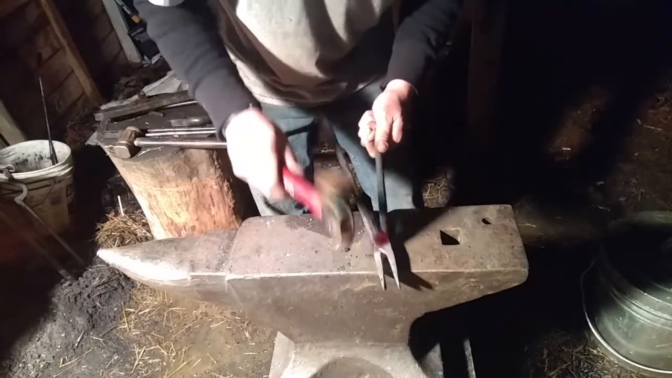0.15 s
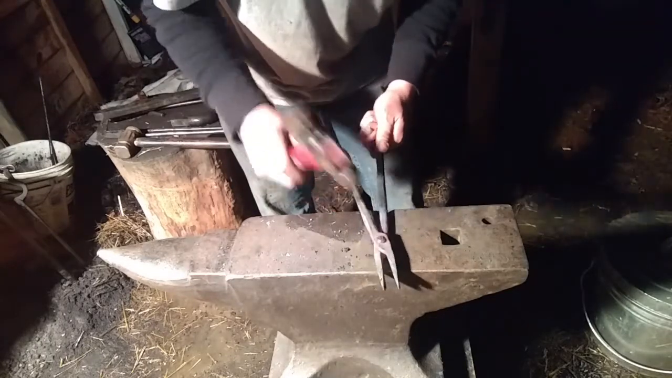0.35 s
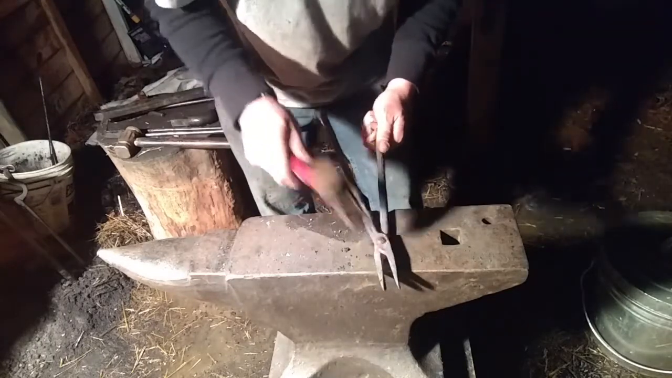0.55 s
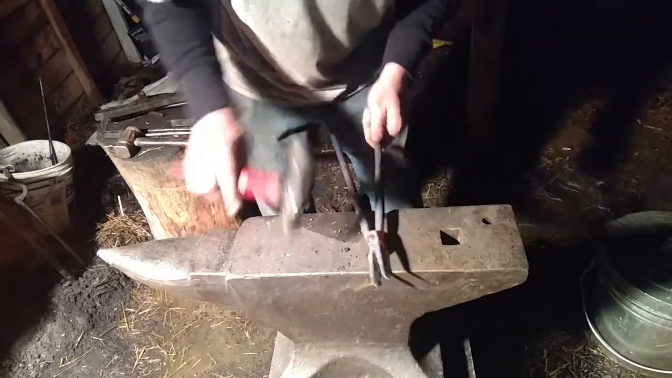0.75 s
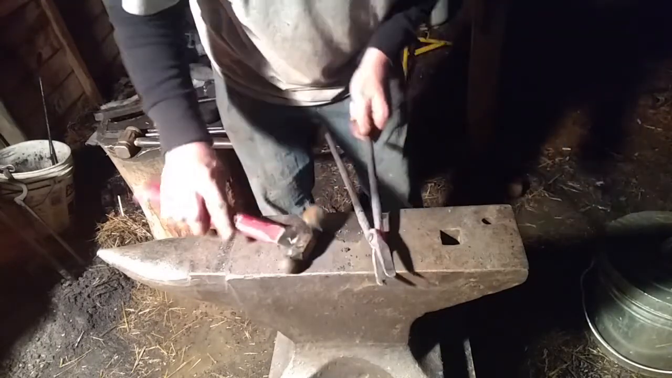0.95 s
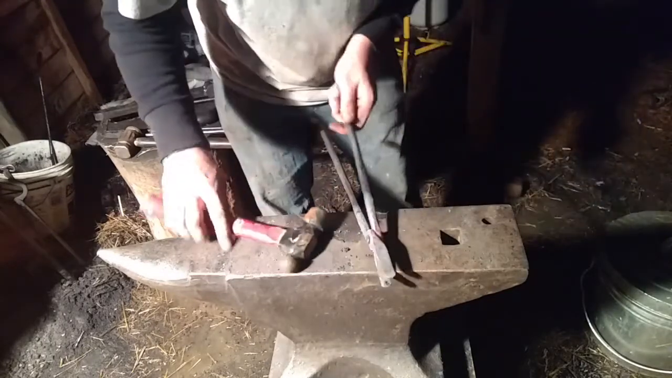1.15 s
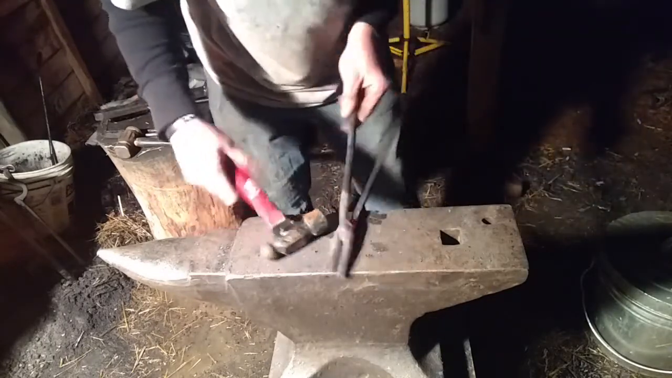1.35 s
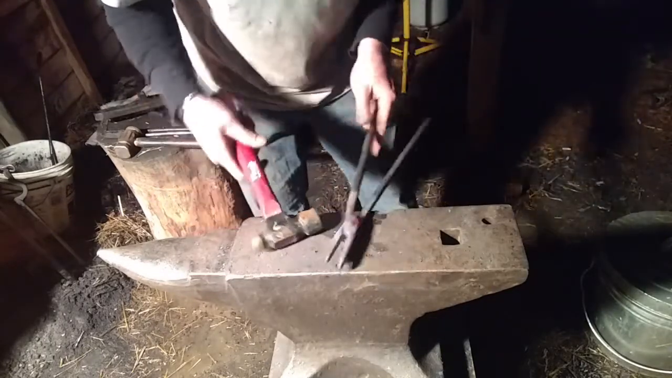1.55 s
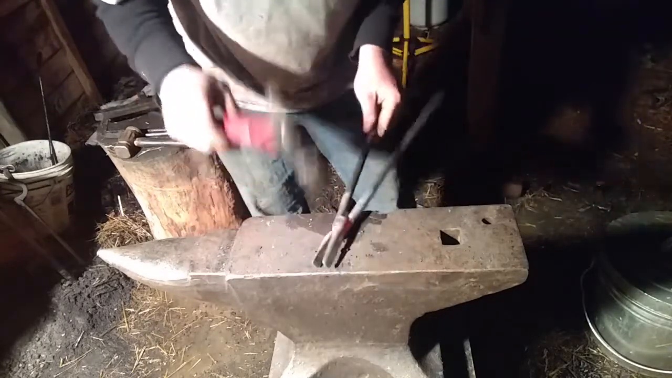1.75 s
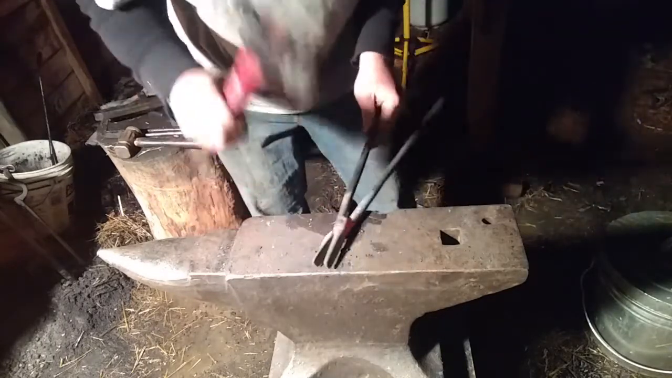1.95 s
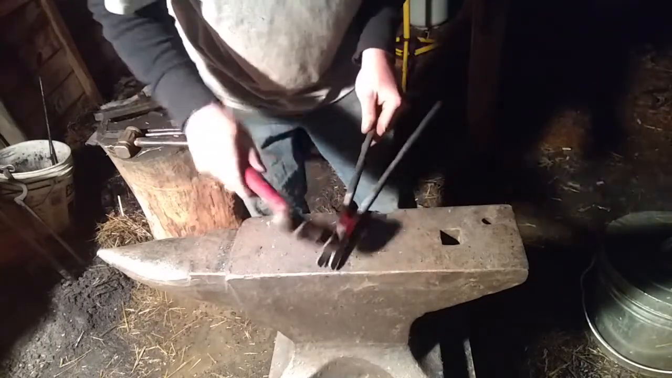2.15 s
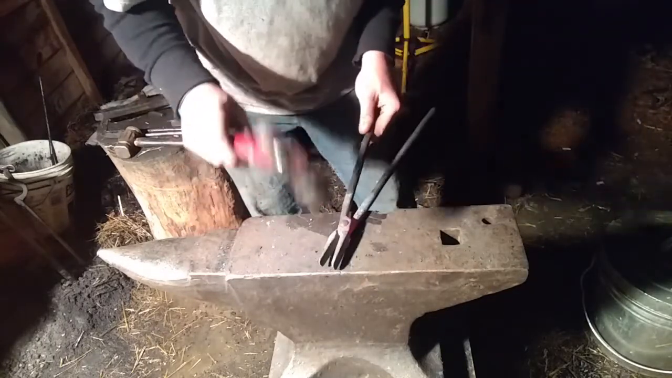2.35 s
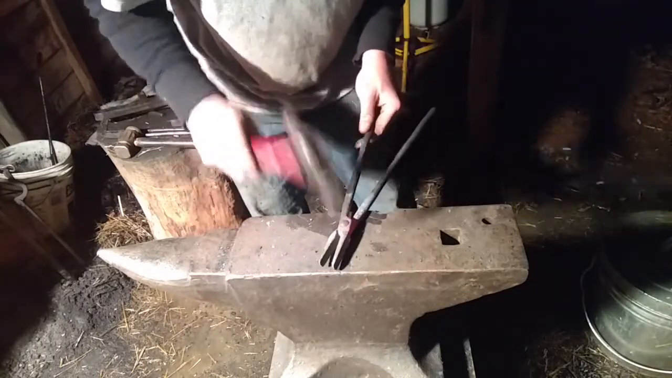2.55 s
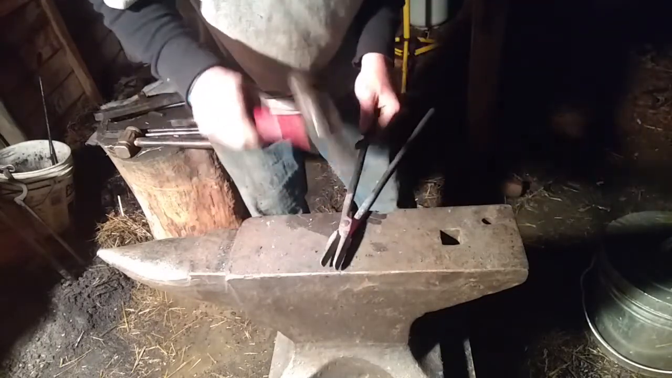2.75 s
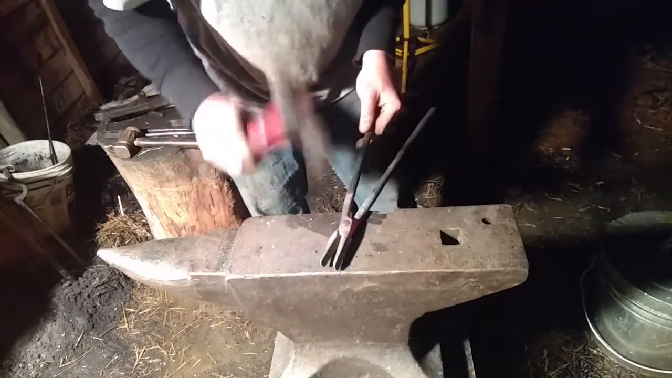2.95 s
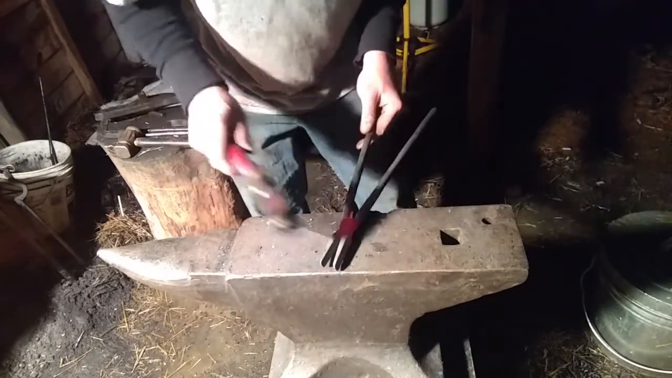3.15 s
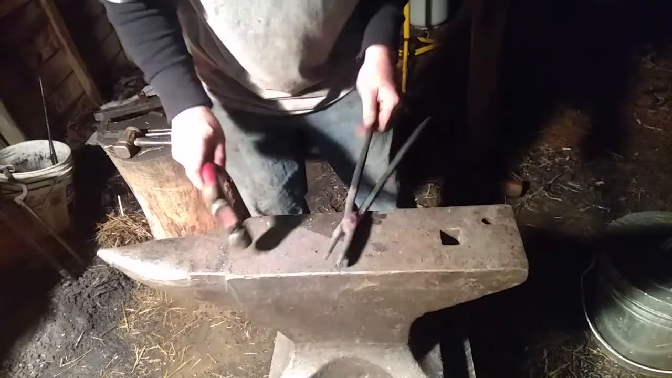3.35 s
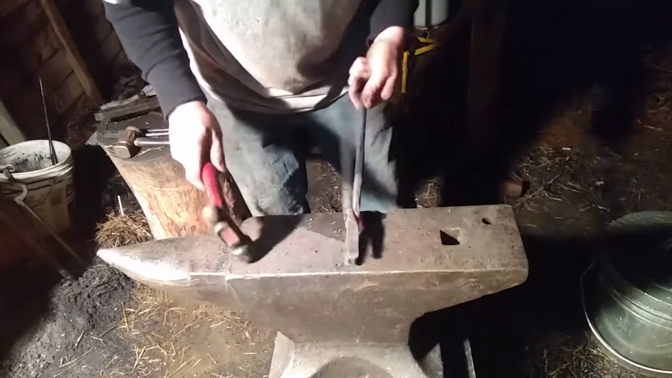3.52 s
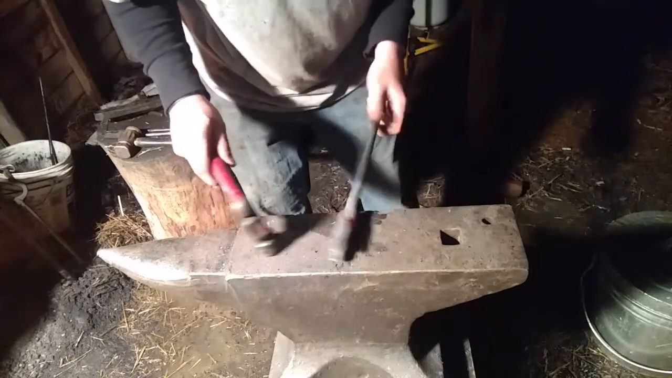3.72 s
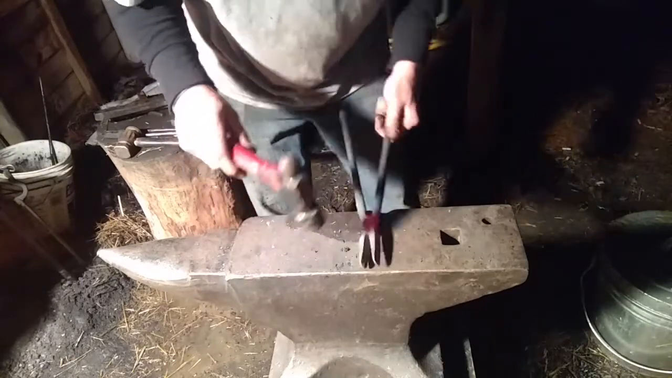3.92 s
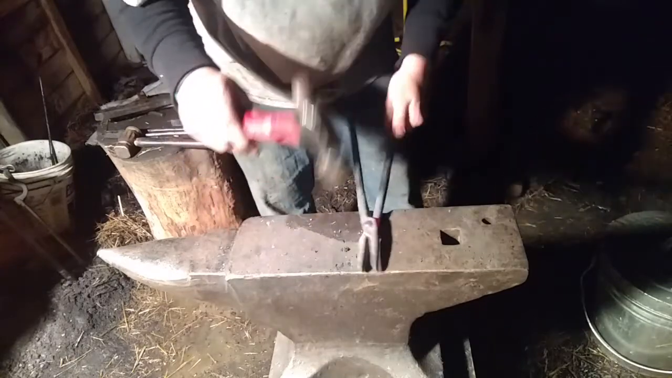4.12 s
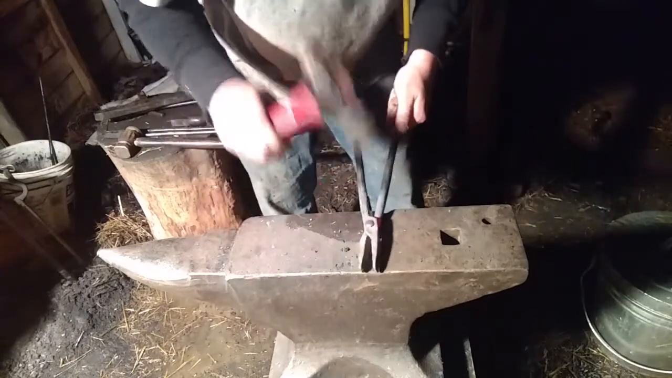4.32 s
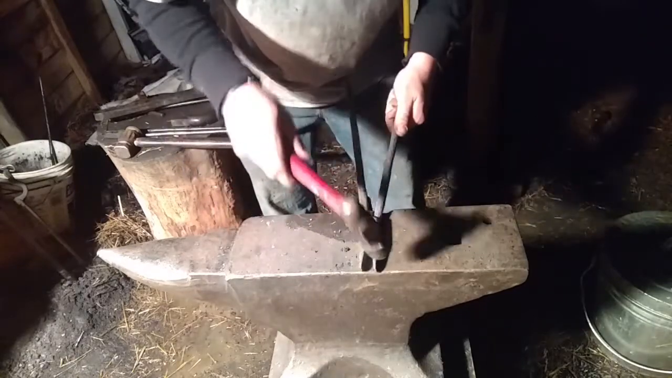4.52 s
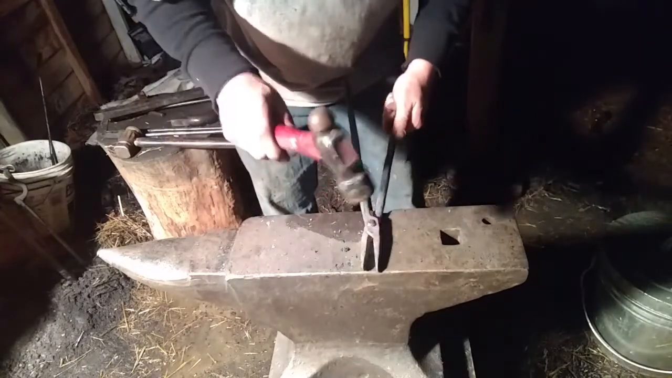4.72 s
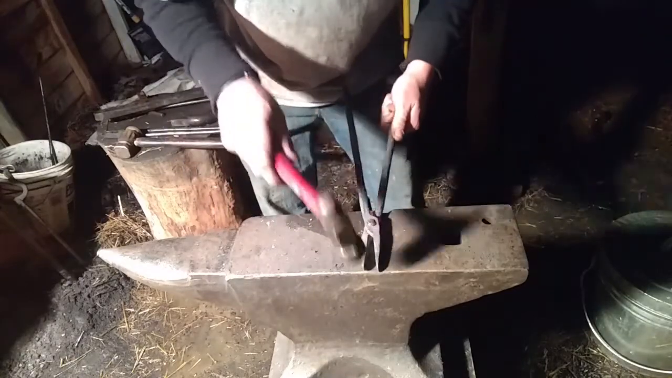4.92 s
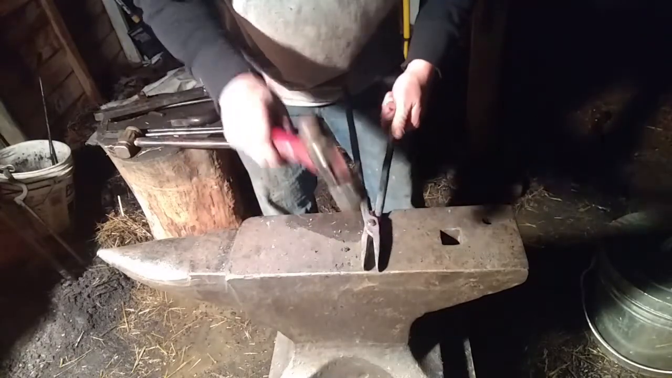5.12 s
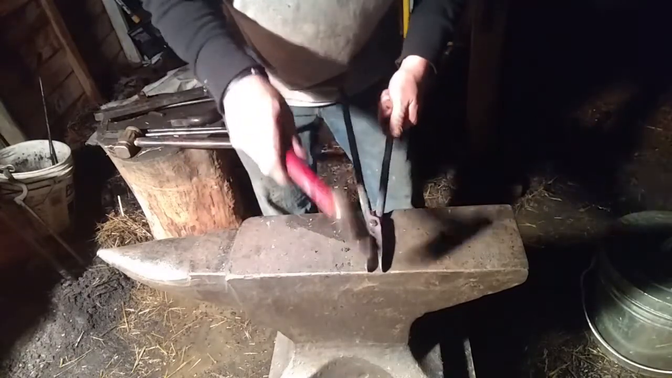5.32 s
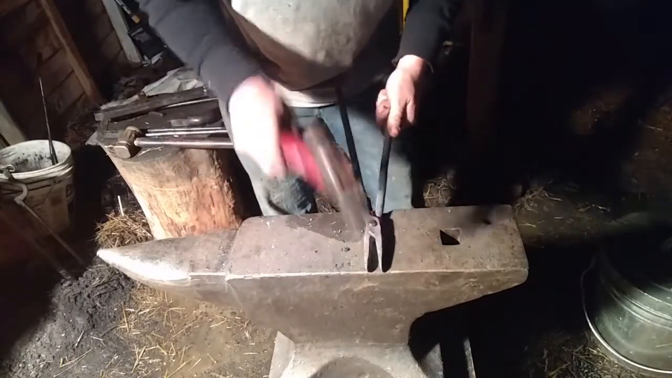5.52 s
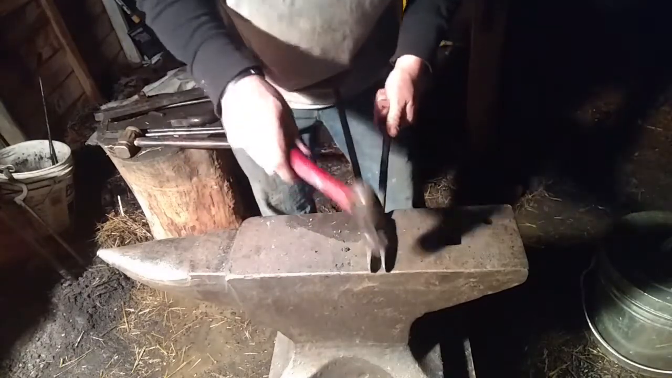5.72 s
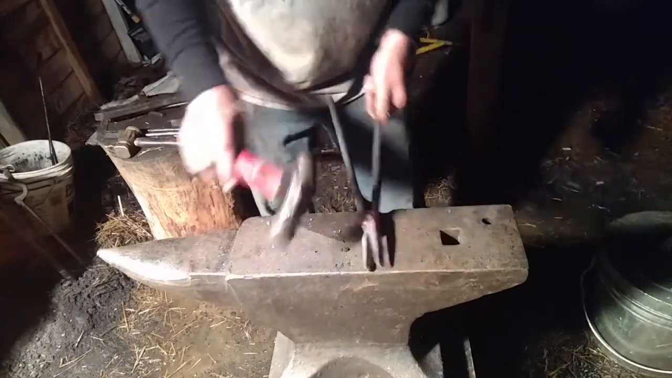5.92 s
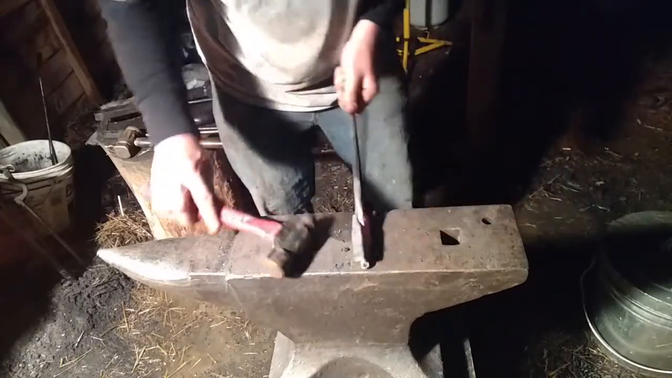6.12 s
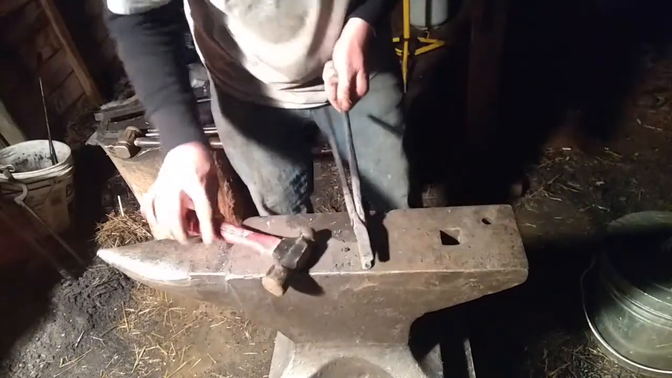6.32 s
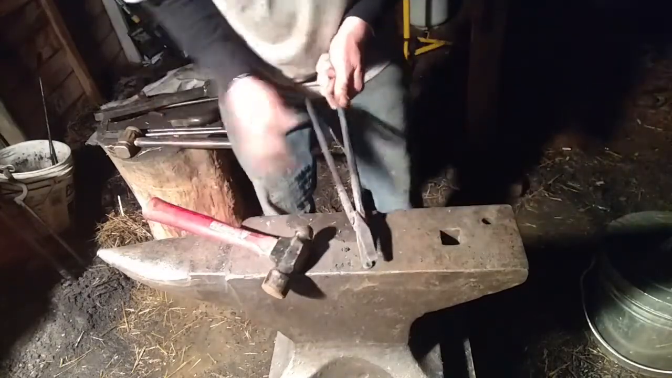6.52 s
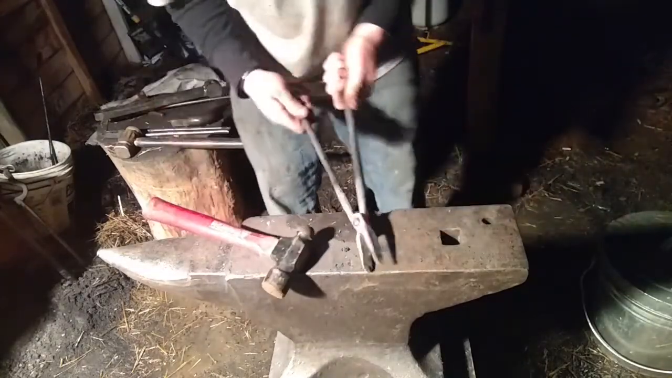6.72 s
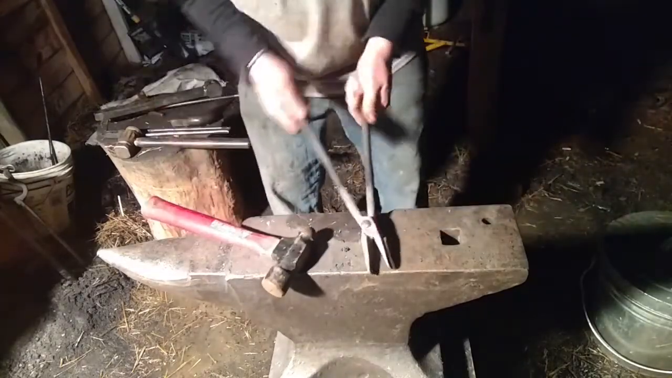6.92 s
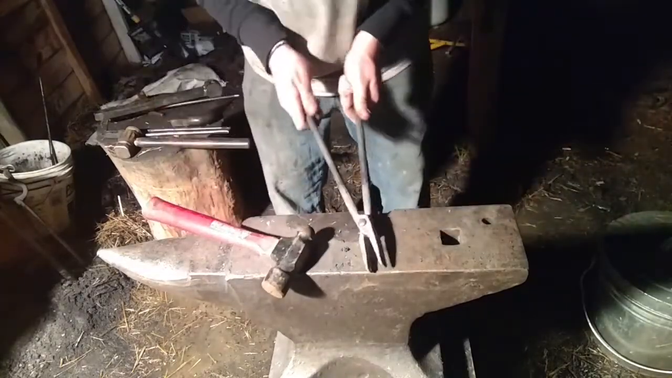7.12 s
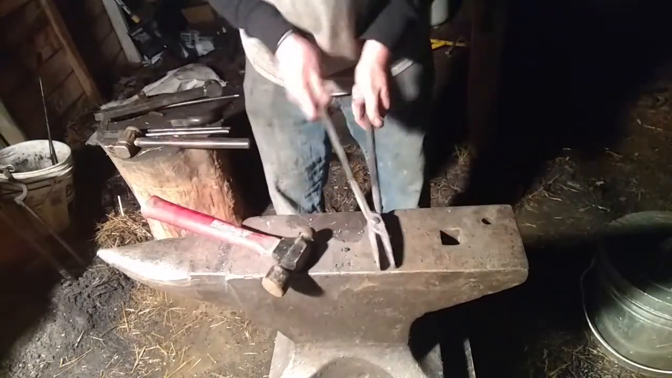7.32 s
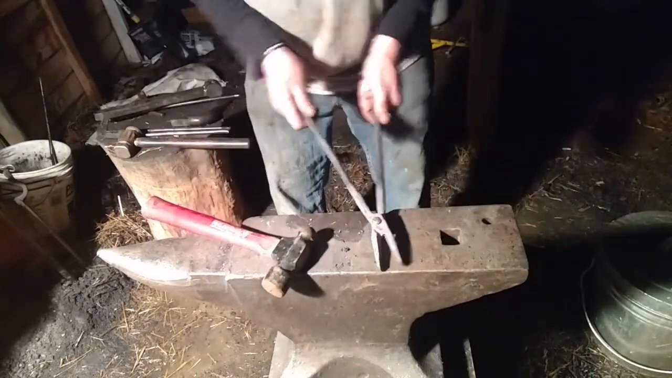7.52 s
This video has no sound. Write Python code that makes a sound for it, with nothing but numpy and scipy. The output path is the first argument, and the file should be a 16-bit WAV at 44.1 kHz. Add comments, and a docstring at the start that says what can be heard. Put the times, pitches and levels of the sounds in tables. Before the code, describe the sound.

In a small forge, dull metallic hammer strikes alternate with bright rattling bounces on bare anvil, tongs clinking, over rushing blower air.

```python
"""Hammer blows on a hot rivet, held in tongs on an anvil: dull cracks of shaped echoes plus ringing modes.
Between them the hammer drops on the bare face and bounces ever faster, ringing; it also taps the face.
The tongs clink as they are turned. Behind, filtered noise makes a forge blower's steady rush, whine and hiss.
Two close microphone ports listen in a small wooden forge. An automatic gain ducks at hard blows and creeps
back, so the blower seems to sag and swell."""
import sys
import numpy as np
from scipy import signal
from scipy.fft import rfft, irfft, next_fast_len
from scipy.io import wavfile
from scipy.ndimage import uniform_filter1d, minimum_filter1d, map_coordinates

SR = 44100
rng = np.random.default_rng(int(sys.argv[2]) if len(sys.argv) > 2 else 0)


def unload_audio(sound):
    """Save the sound as a 16-bit wav file, at the path given as the first command line argument."""
    columns = np.transpose(np.atleast_2d(sound))
    # keep every value between -1 and 1, then stretch to whole-number steps
    steps = np.round(np.clip(columns, -1, 1) * 32767)
    wavfile.write(sys.argv[1], SR, steps.astype(np.int16))


N = 333828
T = np.arange(int(.8 * SR)) / SR  # time axis of one contact, s


def amp(db):
    """Decibels to amplitude gain."""
    return 10 ** (np.asarray(db) / 20)


def unit(x):
    """Scale to rms 1."""
    return x / np.sqrt(np.mean(x ** 2) + 1e-20)


def along(points, hz):
    """Interpolate (f/Hz, value) points on a log frequency axis."""
    f, v = np.transpose(points)
    return np.interp(np.log(hz + 1), np.log(f + 1), v)


def filtered(x, response):
    """Multiply the spectrum of x by a function of frequency."""
    n = x.shape[-1]
    m = next_fast_len(n + 8192)
    spectrum = rfft(x, m) * response(np.fft.rfftfreq(m, 1 / SR))
    return irfft(spectrum, m)[..., :n]


def causal(db):
    """Minimum-phase response with this gain, by folding the cepstrum."""
    cepstrum = irfft(np.log(amp(db)))
    half = len(cepstrum) // 2
    cepstrum[1:half] *= 2
    cepstrum[half + 1:] = 0
    return np.exp(rfft(cepstrum))


def noise_pair(correlation, size):
    """Left and right white noise with a given correlation at each frequency, from mid and side."""
    def mid_side_gains(hz):
        angle = np.arccos(np.clip(along(correlation, hz), -1, 1)) / 2
        return np.array([np.cos(angle), np.sin(angle)])

    mid, side = filtered(rng.standard_normal((2, size)), mid_side_gains)
    return np.array([mid + side, mid - side])


def add(track, t_s, sound):
    """Mix a sound in at time t_s."""
    part = track[:, max(round(t_s * SR), 0):][:, :len(T)]
    part += sound[..., :part.shape[1]]


def treble_db(sound):
    """Running level above 2.5 kHz, averaged over 8 ms."""
    treble = filtered(sound, lambda hz: hz ** 4 / np.sqrt(hz ** 8 + 2500. ** 8))
    power = uniform_filter1d(np.mean(treble ** 2, axis=0), size=350)
    return 10 * np.log10(np.abs(power) + 1e-12)


def at_level(sound, db):
    """Scale a contact so that its running treble level peaks at db."""
    return sound * amp(db - treble_db(sound).max())


# blower air, left-right correlation: f/Hz, correlation
AIR_CORRELATION = [(60, -0.88), (150, -0.15), (380, 0.26), (950, 0.7), (2380, -0.51), (5980, 0.16),
                   (15000, -0.021)]
# blower air, left over right: f/Hz, level/dB
AIR_BALANCE = [(60, 1), (110, -7.5), (200, -7.5), (380, -9), (700, -7.5), (1290, -3), (2380, -5),
               (4400, -2), (8120, 0), (15000, 0.5)]
# spectrum of the rush: f/Hz, level/dB
RUSH_SPECTRUM = [(15, -82), (25, -20), (128, -17), (161, -8), (331, -9), (365, -1), (403, -18), (479, -4.5),
                 (594, -8), (764, -6.5), (826, -5), (1060, -11), (1940, -13), (2270, -12.5), (2600, -19),
                 (3380, -72), (5720, -120)]
# spectrum of the hiss: f/Hz, level/dB
HISS_SPECTRUM = [(1500, -27), (2400, -28), (2800, 1.5), (3500, -0.5), (4600, -0.5), (5200, -5), (6300, 2.5),
                 (7100, -4.5), (7900, -23), (9000, -3), (10500, -20.5), (12000, -12.5), (15000, -28),
                 (16500, -49)]
# blower resonances: f/Hz, width at half amplitude/Hz, level against rush/dB
WHINE_RESONANCES = [(381.4, 41, -13), (771, 19.4, -9), (1089.6, 31, -11.5), (2197, 19, -5)]
RUSH_DB, HISS_DB = -44.5, -48.5


def blower():
    """Steady broadband air noise, narrow resonances excited by noise, and a hiss."""
    def air(response):
        return unit(filtered(noise_pair(AIR_CORRELATION, size=N), response))

    def resonance(centre_hz, width_hz):
        return air(lambda hz: 1 / (1 + (2 * (hz - centre_hz) / width_hz) ** 2))

    rush = air(lambda hz: amp(along(RUSH_SPECTRUM, hz)))
    whine = sum(amp(db) * resonance(centre_hz, width_hz) for centre_hz, width_hz, db in WHINE_RESONANCES)
    hiss = air(lambda hz: amp(along(HISS_SPECTRUM, hz)))
    sound = amp(RUSH_DB) * (rush + whine) + amp(HISS_DB) * hiss
    return filtered(sound, lambda hz: amp(np.outer([.5, -.5], along(AIR_BALANCE, hz))))


# echoes, left-right correlation: f/Hz, correlation
ROOM_CORRELATION = [(100, 0), (400, 0.89), (900, 0.95), (3000, 0.9), (12000, 0.89)]
# tail of the shed: f/Hz, t60/s, level/dB
SHED_TAIL = [(150, 0.49, 0), (700, 0.33, -19.5), (2040, 0.2, 9), (5900, 0.13, 18.5), (13700, 0.15, 6)]


def echoes(near_db, near_t60_s, hold_s, far_db):
    """Dense reflections from floor, smith and benches as decaying noise, plus the shed's short tail."""
    near_envelope = amp(near_db - 60 * np.maximum(T - hold_s, 0) / near_t60_s)
    near = near_envelope * noise_pair(ROOM_CORRELATION, size=len(T))
    hz, t, z = signal.stft(noise_pair(ROOM_CORRELATION, size=len(T)), SR, nperseg=256)
    bands_hz, *columns = np.transpose(SHED_TAIL)
    t60_s, wall_db = [along(np.c_[bands_hz, column], hz)[:, None] for column in columns]
    far = signal.istft(z * amp(far_db + wall_db - 60 * t / t60_s), SR)[1][:, :len(T)]
    arrival = 1 - np.exp(-(T / .002) ** 2)
    return (near + far) * arrival


# first crack against its echoes: f/Hz, level/dB
PUSH_SPECTRUM = [(100, -5.5), (600, -4), (1200, 5.5), (2100, 8.5), (3000, -4), (6000, 4.5), (14000, -9.5)]


def contact(spectrum, tone, crack_db, room):
    """One sharp push and its echoes, coloured by the metal and by how hard it meets."""
    impulse = amp(crack_db) * (T == 0)
    push = filtered(impulse, lambda hz: causal(along(PUSH_SPECTRUM, hz)))
    return filtered(push + room, lambda hz: causal(along(spectrum, hz) + along(tone, hz)))


def colour(thud_db, knock_db, sizzle_db):
    """Tone of one hammer contact, as f/Hz, gain/dB."""
    return [(750, thud_db), (1100, knock_db), (2200, knock_db), (3400, 0.22 * knock_db),
            (6500, -1.95), (9500, sizzle_db)]


def ring(modes):
    """Decaying modes, their strengths drawn anew per impact; phases differ slightly between the ports."""
    hz, db, t60_s = np.transpose(modes)
    strength = amp(db + 1.2 * rng.standard_normal(len(hz)))
    phase = 2 * np.pi * rng.random(len(hz)) + .25 * rng.standard_normal((2, len(hz)))
    swing = np.exp(np.outer(2j * np.pi * hz - np.log(1000) / t60_s, T))
    onset = 1 - np.exp(-T / 0.00035)
    return np.einsum("ck,kt->ct", strength * np.exp(1j * phase), swing).imag * onset


# tongs shifting on the face: t/s, gain/dB, clank gain from 3.4 kHz up/dB
CLINKS = [(0.6848, -25.5, 2.5), (1.3688, -33.5, 8.5), (1.5264, -27, -2.5), (1.7246, -20, -9.5),
          (1.8711, -20, -1.5), (1.937, -20.5, -14), (2.06, -29.5, -9), (3.8808, -26, 9.5),
          (4.0733, -26.5, -16), (4.1594, -29.5, 7)]
# spectrum of tongs on the face: f/Hz, level/dB
CLINK_SPECTRUM = [(100, -24), (700, -5), (1100, -9.5), (1700, 6.5), (2400, -8), (4200, 1.5), (5000, -6),
                  (6200, -6.5), (9000, -19), (15000, -29)]
# modes of the tongs: f/Hz, level/dB, t60/s
TONGS_MODES = [(735, 1, .12), (1523, 4.5, .135), (2690, -5, .06), (4380, -12, .05), (5450, -12, .05),
               (7490, -14, .07), (9378, -15, .08)]


def turning():
    """The tongs tap and scuff the face as they are rolled over: a contact plus their own modes."""
    out = np.zeros((2, N))
    for t_s, db, clank_db in CLINKS:
        room = echoes(near_db=-27.0, near_t60_s=0.14, hold_s=0.0077, far_db=-54)
        tap = contact(CLINK_SPECTRUM, [(2200, 0.013), (3400, clank_db)], -7.5, room)
        add(out, t_s, amp(db) * (amp(19.0) * tap + amp(-22.0) * ring(TONGS_MODES)))
    return out


# spectrum of hammer on bare face: f/Hz, level/dB
FACE_SPECTRUM = [(30, -28), (120, -22), (300, -9), (500, -7.5), (750, 4.5), (950, -3), (1600, 2), (2200, 4),
                 (2900, 0.5), (4200, -1), (7000, -9), (9000, 17.5), (11500, 1), (15500, 4)]
# modes of the anvil face: f/Hz, level/dB, t60/s
FACE_MODES = [(1437, -10, .25), (1526, -3, .25), (1988, -6, .14), (2395, -8, .17), (2802, -6, .15),
              (3235, -12, .15), (3325, -4, .18), (3617, -6, .19), (3914, -5, .14), (4270, -9, .13),
              (4981, -12, .14), (5923, -10, .16), (6298, -14, .14)]
# bending of the whole anvil, horn against heel: f/Hz, level/dB, t60/s
BELL_MODES = [(1032, -11, .4), (1888, 0, .6), (2476, -19, .33)]
# modes of the hammer head: f/Hz, level/dB, t60/s
HAMMER_MODES = [(2295, 7, .05), (2360, 5, .065), (8802, -3, .09), (8886, 1, .115), (13250, -25, .08)]
FACE_DB, FACE_BELL_DB, FACE_THUD_DB = -17.5, -22.5, -1  # relative, before at_level
# a softer contact lasts longer and presses less on the face: change per force lost, dB/dB
SIZZLE_FALL, HAMMER_FALL, CRACK_FALL, FACE_GAIN = 0.96, 0.47, 0.16, 0.24


def face_hit(lost_db, knock_db, sizzle_db, hammer_db, crack_db):
    """Steel on bare steel: a bright click, hammer head and anvil ringing; duller as force is lost."""
    room = echoes(near_db=-15.5, near_t60_s=0.08, hold_s=0.0038, far_db=-32.5)
    tone = colour(knock_db + FACE_THUD_DB, knock_db, sizzle_db - SIZZLE_FALL * lost_db)
    crack = contact(FACE_SPECTRUM, tone, crack_db - CRACK_FALL * lost_db, room)
    bell = amp(FACE_BELL_DB + knock_db) * ring(BELL_MODES)
    # a light tap lets the face ring; a heavy one damps it
    face = amp(FACE_DB + FACE_GAIN * lost_db) * ring(FACE_MODES)
    hammer = amp(hammer_db - HAMMER_FALL * lost_db) * ring(HAMMER_MODES)
    return amp(16) * crack + bell + face + hammer


# hammer head on the face, not flying free: t/s, treble level/dB,
# then at full force and relative: knock/dB, sizzle/dB, hammer ring/dB
TAPS = [(0.842, -6, -5, -19, -8), (0.859, -16, -8, -6, -16), (3.3212, -6, 4.5, -21.5, -51),
        (3.4246, -13.5, 2.5, -21, -45), (3.5189, -21.5, 12, -22, -40), (3.6127, -29, 10.5, -5, -40),
        (3.6826, -43.5, 18, -14, -30)]
FULL_TAP_DB, TAP_CRACK_DB = 1.5, 5  # at full force: treble level, first crack


def tapping():
    """Single contacts of the hammer head with the face, as it topples or is eased down by hand."""
    out = np.zeros((2, N))
    for t_s, db, knock_db, sizzle_db, hammer_db in TAPS:
        hit = face_hit(FULL_TAP_DB - db, knock_db, sizzle_db, hammer_db, TAP_CRACK_DB)
        add(out, t_s, at_level(hit, db))
    return out


# hammer dropped on the bare face: t/s, treble level/dB, loss per bounce/dB,
# then relative, at first contact: knock/dB, sizzle/dB, hammer ring/dB, first crack/dB
DROPS = [(0.8228, -2, 7, -4, -23, -12, 9), (6.0162, -1, 6.5, -2.5, -23.5, -8, 2.5)]
FIRST_FLIGHTS_S, RESTITUTION = (.1365, .1156), .648


def bouncing(count=5):
    """The dropped hammer bounces: restitution shortens every flight and each contact is weaker."""
    out = np.zeros((2, N))
    for (t_s, db, loss_db, *tone), flight_s in zip(DROPS, FIRST_FLIGHTS_S):
        for k in range(count):
            lost_db = k * loss_db
            add(out, t_s, at_level(face_hit(lost_db, *tone), db - lost_db))
            t_s += flight_s * RESTITUTION ** k
    return out


def grip(sound, depth_db, spacing_hz):
    """The jaws lie differently under every blow: a random ripple for their many damped upper resonances."""
    knots = rng.standard_normal(400)

    def ripple(hz):
        random_curve = map_coordinates(knots, [hz / spacing_hz], mode="mirror")
        return random_curve * np.clip(hz / 4000, 0, 1) ** 2

    return filtered(sound, lambda hz: causal(depth_db * ripple(hz)))


# blows on the rivet: t/s, treble level/dB, then relative: knock/dB, thud of the jaws/dB, sizzle/dB,
# anvil bell/dB, first crack/dB; favoured jaw note f/Hz
BLOWS = [(0.0759, -15, 6.5, 1.5, -21, -15, -5.5, 4120), (0.0929, -9.5, 6.5, 0.5, -18, -20, 3, 3544),
         (0.4435, -9.5, 0.5, 0.5, -10.5, -21, 6.5, 5970), (2.103, -7, -7.5, -0.5, -8, -38, -7.5, 6030),
         (2.6095, -9, -2.5, 0, -0.5, -36, -7.5, 8850), (3.04, -14, 8, 6, -8.5, -24, -3, 5740),
         (4.4465, -6.5, -5.5, -6.5, -4.5, -41, 3.5, 8900), (4.8492, -16.5, -7, -5, -5, -46, -4, 3760),
         (5.2048, -8, 2.5, 3.5, -4.5, -35, 3, 3850), (5.5786, -8, 7, 4.5, -4.5, -23.5, 1, 4280)]
# spectrum of hammer on rivet: f/Hz, level/dB
RIVET_SPECTRUM = [(30, -31), (120, -16), (250, -7.5), (390, 3), (460, -9), (620, 1), (740, 6.5), (850, 2),
                  (1250, 0.5), (2000, -2), (3000, -7.5), (6000, -8.5), (11000, -2.5), (15500, -22)]
# modes of the jaws: f/Hz, level/dB, t60/s
JAW_MODES = [(2680, -36, 0.073), (4105, 5, 0.074), (6060, 8, 0.073), (8800, -10, .09), (9700, -19, 0.11),
             (10600, -1.5, 0.084)]
TONGS_DB, TONGS_DB_PER_THUD_DB = -17, 1.93
JAWS_DB, JAW_NOTE_DB = -17.5, -10
JAW_SPREAD = 0.0164  # standard deviation of mode shift per grip, fraction of f


def peening():
    """The hot rivet cushions the hammer: a thick crack, brief notes from the tongs, a little anvil."""
    out = np.zeros((2, N))
    for t_s, db, knock_db, thud_db, sizzle_db, bell_db, crack_db, jaw_hz in BLOWS:
        room = echoes(near_db=-23.0, near_t60_s=0.082, hold_s=0.0016, far_db=-34.0)
        room = grip(room, depth_db=2.8, spacing_hz=260)
        crack = contact(RIVET_SPECTRUM, colour(thud_db, knock_db, sizzle_db), crack_db, room)
        # the soft rivet passes the slow push that bends the anvil, hardly any of the face's higher modes
        anvil = amp(bell_db) * ring(BELL_MODES) + amp(-30) * ring(FACE_MODES)
        shifted_modes = [(hz * (1 + JAW_SPREAD * rng.standard_normal()), level_db, t60_s)
                         for hz, level_db, t60_s in JAW_MODES]
        jaws = amp(JAWS_DB) * ring(shifted_modes)
        jaw_note = amp(JAW_NOTE_DB) * ring([(jaw_hz, 0, .085)])
        tongs = amp(TONGS_DB + TONGS_DB_PER_THUD_DB * thud_db) * ring(TONGS_MODES)
        add(out, t_s, at_level(amp(22.5) * crack + anvil + tongs + jaws + jaw_note, db))
    return out


# phase between the ports: f/Hz, left lead/rad
PORT_PHASE = [(20, 0.5), (1600, 0.08), (2000, -2), (2600, -2.5), (3600, -0.34), (4300, 1.47), (5200, -4),
              (6600, -5.5), (9000, -13), (14000, -21)]


def scene():
    """Work at the anvil, phase-shifted between ports and 1.4 dB louder on the right, over the blower."""
    work = peening() + bouncing() + tapping() + turning()
    work = filtered(work, lambda hz: np.exp(1j * np.outer([.5, -.5], along(PORT_PHASE, hz))))
    return work * amp([[-.7], [.7]]) + blower()


CEILING_DB, START_GAIN_DB = -17.5, -7.5  # treble level allowed, initial gain
RECOVERY_DB_PER_S, GAIN_ATTACK_S = 9, 0.0018


def gain_control(sound):
    """Gain drops quickly when the treble passes the ceiling, then climbs steadily, at most to 0 dB."""
    climb_db = RECOVERY_DB_PER_S * np.arange(N) / SR
    allowed_db = np.minimum(0, CEILING_DB - treble_db(sound))
    lowest_db = np.minimum.accumulate(allowed_db - climb_db)
    gain_db = climb_db + np.minimum(START_GAIN_DB, lowest_db)
    keep = np.exp(-1 / (GAIN_ATTACK_S * SR))
    smooth_db = signal.lfilter([1 - keep], [1, -keep], gain_db - START_GAIN_DB)
    return sound * amp(START_GAIN_DB + smooth_db)


TOP_HZ = 16400


def record(dry):
    """Gain control, a fast peak limiter, then a sharp low-pass at the band limit."""
    ducked = gain_control(dry)
    needed = np.minimum(1, .95 / (np.abs(ducked).max(0) + 1e-9))
    gain = uniform_filter1d(minimum_filter1d(needed, size=89), size=89)  # 2 ms windows
    return filtered(ducked * gain, lambda hz: hz < TOP_HZ)


dry = scene()
out = record(dry)
unload_audio(out)
```